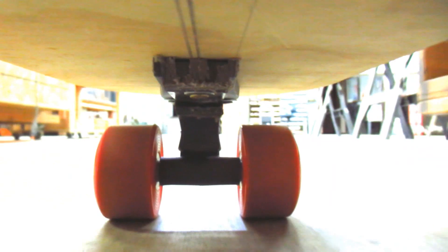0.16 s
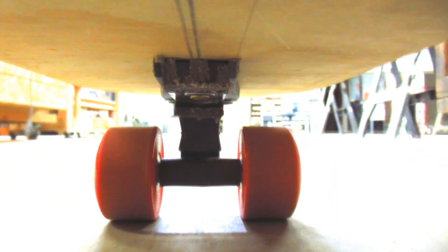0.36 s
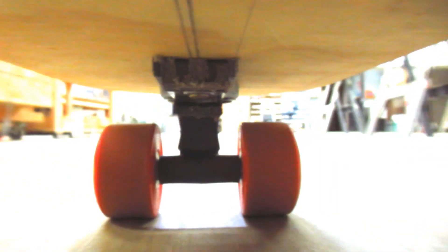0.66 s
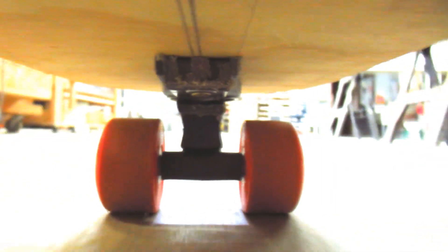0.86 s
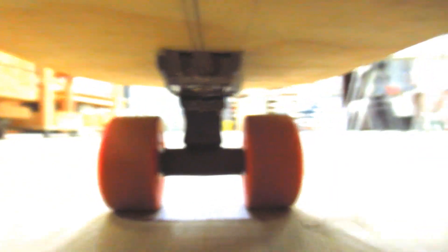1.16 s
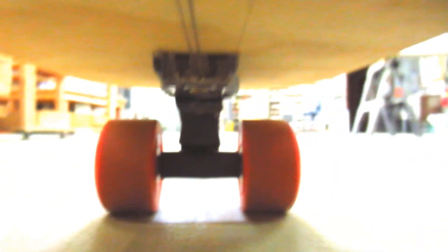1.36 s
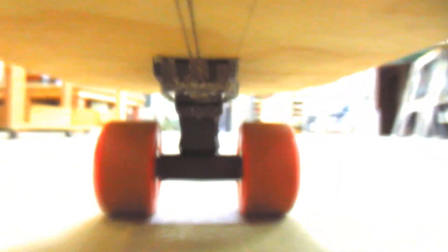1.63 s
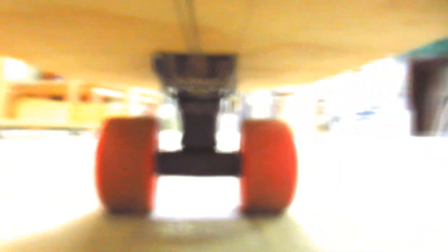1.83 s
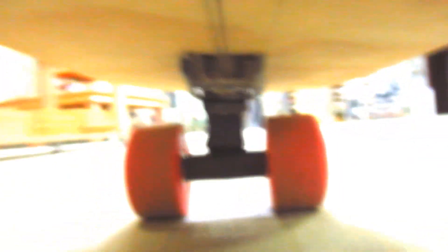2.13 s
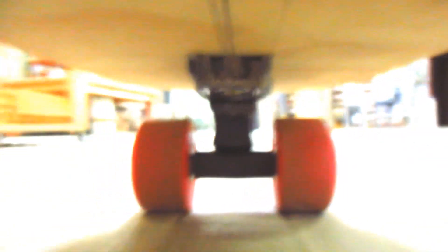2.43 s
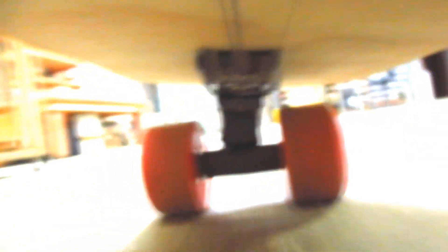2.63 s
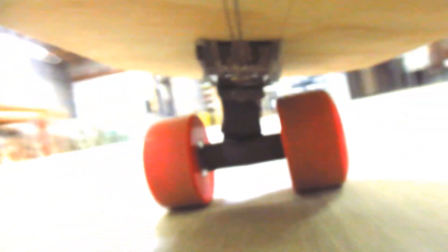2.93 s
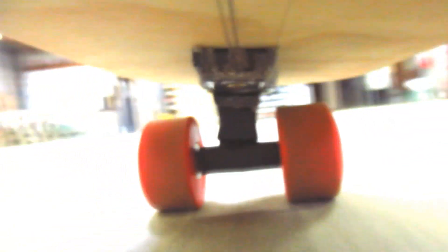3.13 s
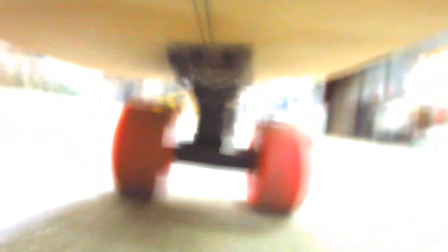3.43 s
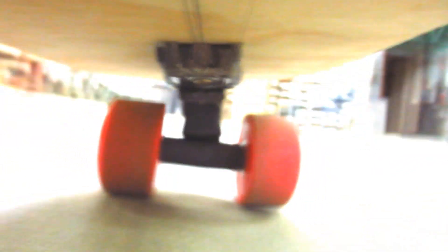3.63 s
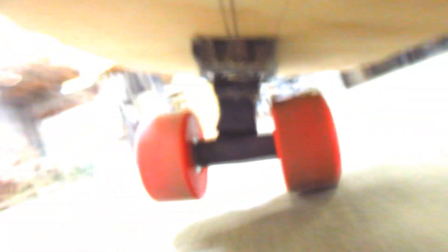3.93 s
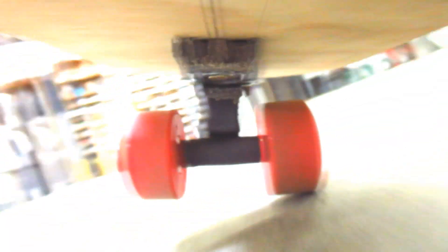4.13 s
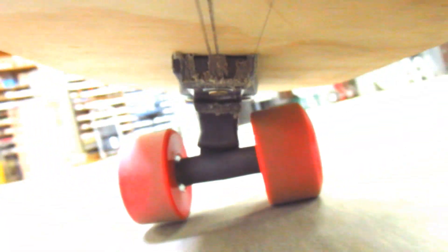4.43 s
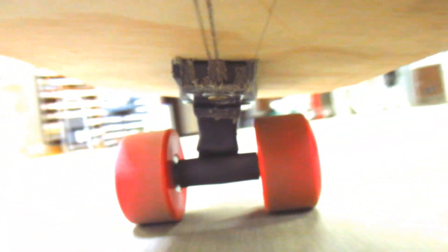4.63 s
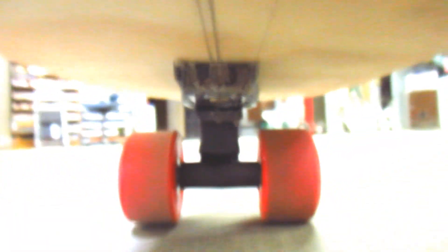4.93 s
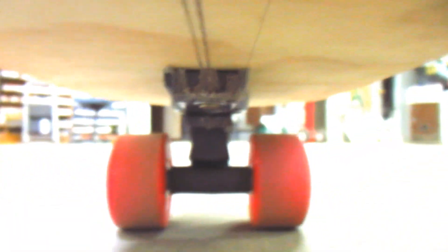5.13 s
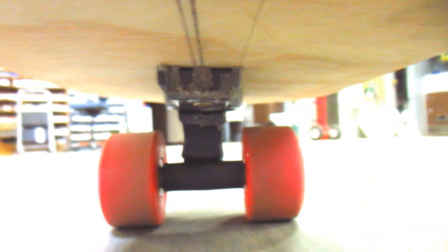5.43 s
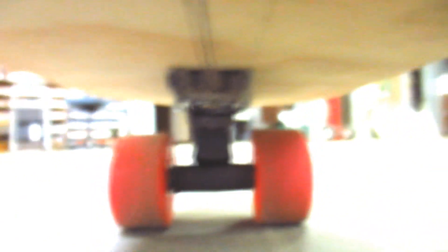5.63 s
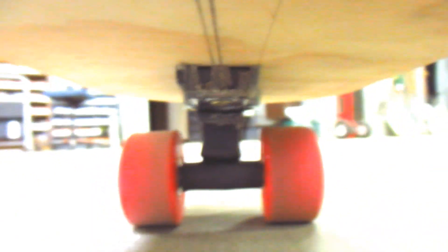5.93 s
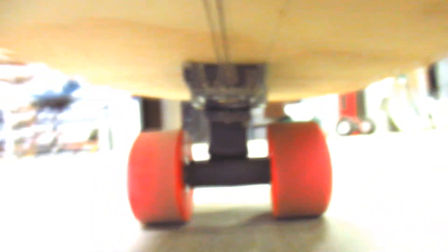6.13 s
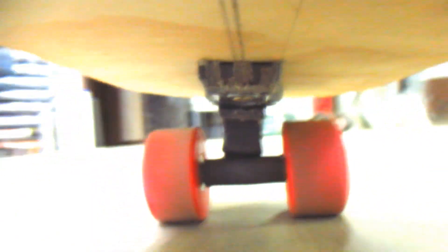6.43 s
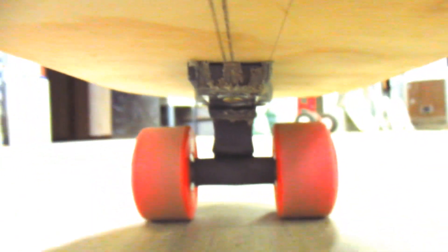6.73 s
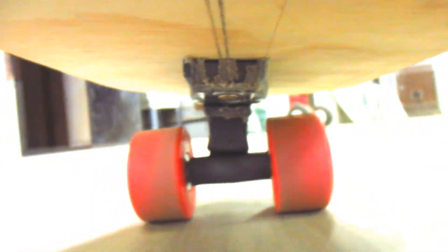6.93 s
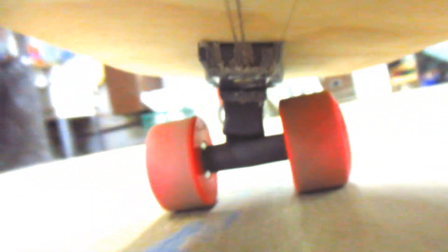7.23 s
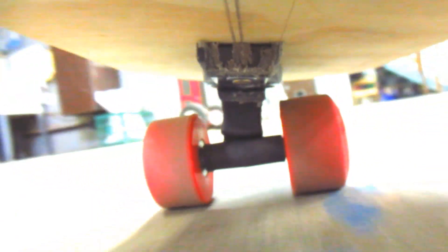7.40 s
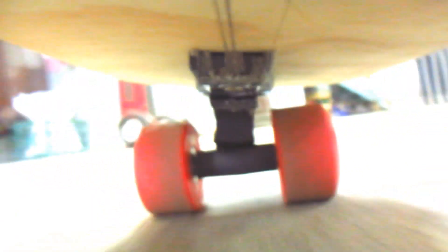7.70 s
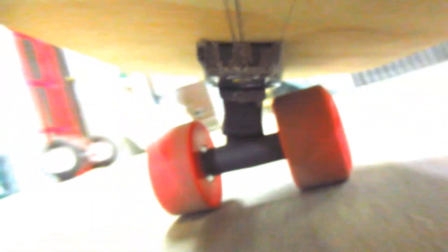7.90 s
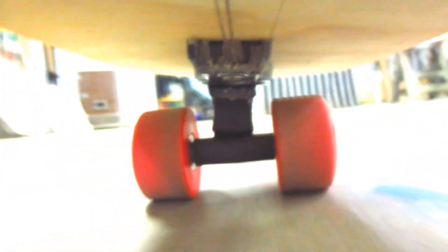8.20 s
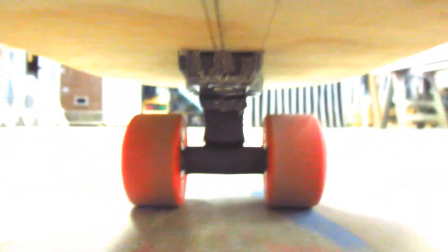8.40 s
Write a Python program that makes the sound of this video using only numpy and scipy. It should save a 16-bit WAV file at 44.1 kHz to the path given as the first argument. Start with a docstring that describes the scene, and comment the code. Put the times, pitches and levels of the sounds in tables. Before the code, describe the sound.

Heard close beneath a wooden skateboard deck in a workshop: near quiet, then two hard knocks as the rider gets on. Rolling builds into low rumble, hollow wheel growl and crackling grit. Irregular thuds and clacks cross cracks, sometimes in clusters, while the loose truck ticks and rattles. Roar rises and falls through turns, with a rasping scuff, a faint metallic chinking and small rubber squeaks near the end. Very little room echo.

```python
"""Skateboard on workshop concrete

A skateboard rides over a concrete floor, heard by two microphones hung under its wooden deck.
Two knocks come as the rider gets on; then noise bumps rumble in the deck and growl in the hard wheels,
with crackling grit. Damped modes bang over cracks; gliding resonances roar, short sines chatter and
rasping noise scuffs in the turns. The loose truck ticks, rattles, creaks and squeaks, and a washer chinks."""
import sys
import numpy as np
from scipy import signal
from scipy.fft import rfft, irfft
from scipy.io import wavfile
from scipy.ndimage import uniform_filter1d

SR = 44100
rng = np.random.default_rng(int(sys.argv[2]) if len(sys.argv) > 2 else 0)


def unload_audio(sound):
    """Save the sound as a 16-bit wav file, at the path given as the first command line argument."""
    columns = np.transpose(np.atleast_2d(sound))
    # keep every value between -1 and 1, then stretch to whole-number steps
    steps = np.round(np.clip(columns, -1, 1) * 32767)
    wavfile.write(sys.argv[1], SR, steps.astype(np.int16))


N = 377496
TIME = np.arange(N) / SR
HIT = np.arange(8192) / SR  # time axis of one hit, s


def undb(db):
    """Decibels to gain."""
    return 10 ** (np.asarray(db) / 20)


def unit(x):
    """Scale to rms 1."""
    return x / np.sqrt(np.mean(x ** 2))


def punch(x, size):
    """Scale so that the first `size` samples of a hit have rms 1."""
    return x / np.sqrt(np.mean(x[..., :size] ** 2))


def decay(t, t60_s):
    """Exponential fade of 60 dB in t60_s."""
    return undb(-60 * t / t60_s)


def attack(t, rise_s):
    """Exponential approach to 1."""
    return 1 - np.exp(-t / rise_s)


def curves(table):
    """The dB columns of a table as gains over time."""
    s, *columns = np.transpose(table)
    return [undb(np.interp(TIME, s, c)) for c in columns]


def swells(rows):
    """Smooth rises and falls, one for each (middle_s, length_s, height)."""
    out = np.zeros(N)
    for s, length, height in rows:
        add(out, s - length / 2, height * np.hanning(int(length * SR)))
    return out


def add(track, s, sound):
    """Mix a sound in at time s."""
    i = max(int(s * SR), 0)
    track[i:i + len(sound)] += sound[:max(N - i, 0)]


def gains(points, size):
    """A (Hz, dB) spectrum as gains on the bins of a transform."""
    hz, db = np.transpose(points)
    bins_hz = np.fft.rfftfreq(size, 1 / SR)
    return undb(np.interp(np.log(bins_hz + 1), np.log(hz), db))


def colour(x, points, size=4096):
    """Causal minimum-phase filter with the given spectrum."""
    cepstrum = irfft(np.log(gains(points, size)))
    cepstrum[1:size // 2] *= 2
    cepstrum[size // 2 + 1:] = 0
    response = irfft(np.exp(rfft(cepstrum)))
    return signal.fftconvolve(x, response)[:len(x)]


def walk(rate_hz):
    """Smooth random wander about zero, rms 1."""
    k = int(SR / rate_hz)
    steps = np.repeat(rng.standard_normal(N // k + 1), k)
    return unit(uniform_filter1d(steps, k)[:N])


def bumps(rate_hz, spread_db):
    """Random contacts of either sign, scattered in strength by spread_db."""
    chance, size, sign = rng.random(N), rng.standard_normal(N), rng.choice([-1, 1], N)
    return (chance < rate_hz / SR) * sign * undb(spread_db * np.clip(size, -2.5, 2.5))


def crackle(rate_hz, spread_db, t60_s):
    """Random grains, each a brief fading burst of noise."""
    power_step = undb(-120 / (t60_s * SR))
    power = signal.lfilter([1], [1, -power_step], bumps(rate_hz, spread_db) ** 2 + 1e-9)
    return np.sqrt(power) * rng.standard_normal(N)


def ring(modes, scatter_db, detune):
    """Damped modes; each call draws new weights, signs and detuning, as if struck elsewhere."""
    hz, t60, db = np.transpose(modes)[:, :, None]
    a, b, c = rng.standard_normal((3, len(modes), 1))
    envelope = undb(db + scatter_db * a) * decay(HIT, t60)
    tones = np.sin(2 * np.pi * hz * (1 + detune * b) * HIT)
    return np.sum(np.sign(c) * envelope * tones, axis=0)


def resonance(x, hz, width_hz):
    """A resonance whose pitch moves."""
    turn = np.exp(2j * np.pi * np.cumsum(hz) / SR)
    return np.imag(turn * signal.lfilter([1], [1, -np.exp(-np.pi * width_hz / SR)], x / turn))


# stereo width of the two ports: freq_hz [Hz], side_minus_mid_db [dB]
PORT_WIDTH = [(50, -28), (130, -19), (280, -12), (480, -3), (660, -8), (870, -5), (1150, -8), (1900, -2),
              (2400, -4), (3000, 0), (16000, 0)]
# balance of the two ports: freq_hz [Hz], left_minus_right_db [dB]
PORT_BALANCE = [(60, .2), (150, .6), (330, -1.4), (500, -1), (900, -4.5), (1300, -2), (2200, -3), (3200, 0),
                (4400, 3.5), (6200, -2.5), (7500, .3), (16000, .6)]


def ports(x, scatter_t60_s=0.025, size=2048):
    """Deck-floor reflections reach the two microphone ports differently, more so in the treble."""
    paths = rfft(rng.standard_normal(size) * decay(HIT[:size], scatter_t60_s))
    side = gains(PORT_WIDTH, size) * paths / np.abs(paths)
    lean = np.sqrt(gains(PORT_BALANCE, size))
    pair = np.array([(1 + side) * lean, (1 - side) / lean]) / np.sqrt(1 + np.abs(side) ** 2)
    response = np.roll(irfft(pair), size // 2, axis=1)
    return signal.fftconvolve(x[None], response, axes=1)[:, size // 2:size // 2 + N]


def hiss(level_db=-82):
    """Faint even microphone hiss: white noise, independent per channel."""
    return undb(level_db) * rng.standard_normal((2, N))


# steady bed spectrum: freq_hz [Hz], density_db [relative dB per Hz]
BED_SPECTRUM = [(30, 13), (120, -9), (300, -7), (600, -5), (1200, -4), (1800, -27), (2350, -8.5),
                (3200, -29), (8000, -30), (16000, -21)]


def steady_bed(level_db=-58):
    """A faint steady bed of coloured noise, with a band near 2.3 kHz."""
    return ports(undb(level_db) * unit(colour(rng.standard_normal(N), BED_SPECTRUM)))


def workshop(x, t60_s=0.18, wet_db=-27):
    """Faint tail of the cluttered room: convolution with decaying low-passed noise."""
    t = TIME[:SR // 2]
    tail = rng.standard_normal((2, len(t))) * decay(t, t60_s) * attack(t, 0.0066)
    tail = tail / np.sqrt(np.sum(tail[0] ** 2))
    tail = signal.lfilter(*signal.butter(1, 3000, fs=SR), tail)
    return undb(wet_db) * signal.fftconvolve(x, tail, axes=1)[:, :N]


# loose washer's modes: freq_hz [Hz], t60_s [s], level_db [relative dB]
WASHER_RING = [(2220, 0.023, 5), (2410, 0.031, 4)]
# chinking runs: start_s [s], end_s [s], level_db [dB]
CHINK_RUNS = [(6.419, 6.99, -41), (7.403, 7.6, -37.5)]


def washer(count=12, gap_s=0.052, jitter_s=0.036):
    """A loose washer is thrown against its nut at uneven intervals and rings briefly."""
    out = np.zeros(N)
    for start, end, db in CHINK_RUNS:
        times = start + gap_s * np.arange(count) + jitter_s * rng.standard_normal(count)
        for s in times:
            chink = ring(WASHER_RING, scatter_db=1, detune=.02)
            if s < end:
                add(out, s, undb(db) * punch(chink, size=220))
    return ports(out)


# bushing squeaks in the tightest turns: middle_s [s], length_s [s], pitch_hz [Hz], level_db [dB]
SQUEAK_EVENTS = [(4.65, .07, 1080, -43), (8.395, 0.034, 1070, -33.5), (8.447, 0.066, 1010, -40)]
# squeak partials: pitch_multiple [ratio], level_db [relative dB]
PARTIALS = [(1, 1), (1.55, -9), (2.27, -11.5), (2.95, -12)]


def squeaks(width_hz=110, waver=.025):
    """Rubber dragged round the kingpin: random slips drive a few wavering resonant partials."""
    s, length, hz, db = np.transpose(SQUEAK_EVENTS)
    pitch = np.interp(TIME, s, hz) * (1 + waver * walk(40))
    slips = bumps(rate_hz=4100, spread_db=11)
    song = np.zeros(N)
    for multiple, level_db in PARTIALS:
        narrow = resonance(slips, multiple * pitch, width_hz)
        song += undb(level_db) * unit(resonance(narrow, multiple * pitch, 3 * width_hz))
    return ports(unit(song) * swells(zip(s, length, undb(db))))


# bushing creaks and snaps while steering: middle_s [s], length_s [s], level_db [dB]
CREAK_EVENTS = [(1.252, 0.0073, -31), (4.504, 0.008, -38), (4.552, 0.0077, -36), (4.618, 0.12, -43),
                (4.66, 0.022, -33), (6.583, .07, -38), (8.383, 0.0063, -25), (8.412, 0.093, -43),
                (8.464, 0.015, -37.5)]
# rubber bushing creak spectrum: freq_hz [Hz], density_db [relative dB per Hz]
BUSHING_SPECTRUM = [(500, -12), (850, 3.5), (1000, 2.5), (1250, -4), (1900, -6), (2400, -3), (2750, -5.5),
                    (3300, -13), (3900, -21), (5500, -21.5), (9000, -24.5), (16000, -30)]


def creaks():
    """A bushing sticks and slips in short runs that ring the truck: bumps and noise, coloured."""
    out = np.zeros(N)
    for s, length, db in CREAK_EVENTS:
        swell = np.hanning(int(length * SR))
        slips = bumps(rate_hz=900, spread_db=3) + .15 * rng.standard_normal(N)
        slips = np.pad(slips[:len(swell)] * swell, (0, len(HIT)))
        add(out, s - length / 2, undb(db) * punch(colour(slips, BUSHING_SPECTRUM), size=len(swell)))
    return ports(out)


# wheels slipping sideways: middle_s [s], length_s [s], level_db [dB]
SCUFF_EVENTS = [(1.274, 0.092, -48), (1.408, .05, -46), (4.62, 0.13, -46), (4.659, 0.028, -44),
                (4.863, 0.034, -26), (6.584, 0.1, -45.5)]
# sliding tread spectrum: freq_hz [Hz], density_db [relative dB per Hz]
SCUFF_SPECTRUM = [(600, -70), (1000, 18), (2000, -1), (3000, 2), (4000, 0.5), (6000, 5), (10000, 2.5),
                  (16000, -4.5)]


def scuffs():
    """A sliding tread sticks and slips in a dense rasp of coloured bumps."""
    slip = swells((s, length, undb(db)) for s, length, db in SCUFF_EVENTS)
    return ports(slip * unit(colour(bumps(rate_hz=20000, spread_db=6), SCUFF_SPECTRUM)))


# randomly strewn ticks: start_s [s], end_s [s], snap_db, ring_db [dB before trims in ticks()]
STRAY_SPELLS = [(1.779, 3.8, -51, -46), (4.85, 7.752, -49.5, -53.5)]


def stray_ticks(count=32, scatter_db=5.5):
    """Rows of random ticks, strewn unevenly over each spell."""
    rows = []
    for start, end, snap_db, ring_db in STRAY_SPELLS:
        times = start + (end - start) * (np.arange(count) + rng.random(count)) / count
        scatter = scatter_db * rng.standard_normal((count, 2))
        rows += [(s, snap_db + a, ring_db + b) for s, (a, b) in zip(times, scatter)]
    return rows


# single grain cracks and truck ticks: start_s [s], snap_db, ring_db [dB before trims in ticks()]
TICK_EVENTS = [(0.185, -54, -62), (0.202, -57, -64), (1.288, -41, -60), (1.397, -48, -45),
               (1.495, -46, -44), (1.558, -57, -40), (1.749, -47, -43), (1.928, -53, -39),
               (2.146, -53, -32.5), (2.317, -41.5, -40.5), (2.442, -39.5, -47), (2.576, -42, -40),
               (2.625, -41, -36.5), (2.883, -38.5, -39), (3.137, -49, -34.5), (3.177, -42, -49),
               (3.748, -46, -40), (3.892, -40, -39), (3.927, -42, -51), (4.216, -49, -54),
               (4.672, -39.5, -60), (4.986, -55, -41), (5.009, -55, -42), (5.348, -42, -61),
               (5.422, -53, -40), (5.589, -43, -51), (5.673, -41, -32), (5.712, -35, -56),
               (6.178, -45, -60), (6.313, -42, -44), (6.869, -41.5, -68), (6.921, -37.5, -65),
               (7.629, -38.5, -67)]
# loose-truck rattle bouts: middle_s [s], length_s [s], level_db [dB before channel gains]
RATTLE_BOUTS = [(1.385, 0.069, -42.5), (1.974, 0.44, -48), (2.498, 0.71, -57), (2.836, 0.23, -45.5),
                (3.174, .22, -46), (3.355, 0.082, -40.5), (3.6, 0.35, -44.5), (4.097, 0.2, -53),
                (4.97, .16, -57), (5.723, 0.18, -48)]
# metal truck's damped resonance: freq_hz [Hz], density_db [relative dB per Hz]
TRUCK_SPECTRUM = [(1500, -12), (2800, -5), (3500, -7), (4000, 2), (4450, 5), (5000, 4), (5600, -9),
                  (7500, -13), (10000, -36), (16000, -38)]
# floor grit, also in knocks and wheels: freq_hz [Hz], density_db [relative dB per Hz]
GRIT_SPECTRUM = [(800, -4), (2000, 15.5), (3200, 5), (4500, 4), (6000, 1), (8500, 0.5), (11000, -4.5),
                 (14000, -7.5), (16000, -15)]


def ticks(t60_s=0.017, snap_trim_db=3, ring_trim_db=-2, left_db=2.75, right_db=-5.5):
    """Grains snap under the tread; the truck, off to the left, ticks and rattles: noise bursts."""
    snaps, taps = np.zeros(N), np.zeros(N)
    looseness = swells((s, length, undb(db)) for s, length, db in RATTLE_BOUTS)
    impacts = crackle(rate_hz=170, spread_db=4, t60_s=.007)
    rattle = looseness * unit(colour(impacts, TRUCK_SPECTRUM))
    for s, snap_db, ring_db in TICK_EVENTS + stray_ticks():
        bursts = rng.standard_normal((2, len(HIT))) * decay(HIT, t60_s) * attack(HIT, 0.00016)
        snap = punch(colour(bursts[0], GRIT_SPECTRUM), size=176)
        tap = punch(colour(bursts[1], TRUCK_SPECTRUM), size=176)
        add(snaps, s, undb(snap_db + snap_trim_db) * snap)
        add(taps, s, undb(ring_db + ring_trim_db) * tap)
    return ports(snaps) + (taps + rattle) * undb([[left_db], [right_db]])


# wheels hopping on their own springiness: middle_s [s], length_s [s], pitch_hz [Hz], peak_rms_db [dB]
CHATTER_EVENTS = [(3.638, .05, 170, -7.5), (4.077, 0.1, 217.5, -16.5), (4.52, .035, 232, -19),
                  (4.935, .09, 154.7, -11.5), (5.029, 0.0445, 210, -9.5), (5.237, 0.11, 208.3, -20.5)]


def chatter():
    """A wheel hops at a nearly steady rate: short sine swells."""
    out = np.zeros(N)
    for s, length, hz, db in CHATTER_EVENTS:
        swell = np.hanning(int(length * SR))
        hops = np.sin(2 * np.pi * hz * TIME[:len(swell)])
        add(out, s - length / 2, np.sqrt(2) * undb(db) * swell * hops)
    return ports(out)


# the ride: time_s [s], drive_db [dB, per wheel before layer gains], floor_coarseness_db [dB]
RIDE_CURVE = [(.25, -57, -16), (.35, -42, -8), (.82, -40.5, -7.5), (.98, -42, -4.5), (1.07, -33, -3.5),
              (1.5, -23.5, 1), (1.68, -35.5, 0), (1.92, -24, 0.5), (3.55, -19.5, 1), (4.14, -21.5, 1),
              (4.3, -27, -4), (5.35, -25, -1), (5.56, -30.5, -7), (5.65, -17, 5), (6.1, -26.5, 2.5),
              (7.66, -21, 1.5), (7.86, -27.5, 1), (8.56, -27, 0)]
CRUISE_DB = -22  # reference drive level


def rolling_gain():
    """How hard the board rolls, as a gain over time."""
    return curves(RIDE_CURVE)[0]


# hollow wheel swells as the rider leans:
# middle_s [s], length_s [s], pitch_hz [Hz], level_db [dB, gain added to the rest roar]
ROAR_SWELLS = [(.79, 0.29, 690, -45), (1.44, 0.52, 693, -31), (1.955, 0.57, 830, -35),
               (3.0, 0.55, 504, -38), (4.077, 0.33, 470, -28), (4.914, 0.57, 710, -32),
               (5.376, 0.37, 700, -27.5), (5.756, 0.38, 820, -28.5), (6.943, 0.38, 880, -37.5),
               (7.2, 0.43, 540, -33), (7.6, 0.77, 654, -37)]


def roar(rest_db=-24):
    """Floor grain drives a hollow resonance of the loaded wheels, gliding from lean to lean."""
    s, length, hz, db = np.transpose(ROAR_SWELLS)
    pitch = np.interp(TIME, s, hz)
    # the rest level follows the ride; swells add to it as gains
    level = undb(rest_db) * rolling_gain() + swells(zip(s, length, undb(db)))
    grain = bumps(rate_hz=2000, spread_db=2.0)
    hollow = resonance(resonance(grain, pitch, width_hz=210), pitch, width_hz=220)
    return ports(unit(hollow) * level)


# blows through wheels and deck: start_s [s], bounce_hz [Hz], thud_db [dB], clack_db [dB]
KNOCK_EVENTS = [(.031, 200, -65, -49), (0.083, 200, -60, -45.5), (.131, 187, -13, -33),
                (0.142, 309, -10.5, -13.5), (0.16, 148, -27, -34), (.172, 80, -24, -41),
                (.458, 197, -48, -45.5), (0.6114, 150, -6, -8), (0.617, 158, -20, -15.5),
                (.634, 110, -23, -37), (1.2498, 118, -28, -34), (1.368, 198, -14, -18),
                (1.376, 164, -12.5, -20.5), (1.462, 150, -22, -33), (1.564, 187, -19, -22),
                (1.578, 207, -6, -13.5), (1.976, 229, -37, -23), (2.13, 178, -11.5, -20.5),
                (2.05, 170, -38, -37), (3.105, 167, -21, -27.5), (3.326, 173, -12, -27),
                (3.354, 111, -7.5, -24), (3.424, 162, -11.5, -25), (3.496, 159, -10, -26),
                (3.559, 173, -15, -21.5), (3.574, 175, -10, -24.5), (3.766, 196, -20, -28),
                (3.888, 180, -20, -31), (4.776, 150, -21, -46), (4.824, 130, -19, -27),
                (4.851, 170, -26, -21), (4.859, 153, -12, -39), (5, 170, -16, -25), (5.074, 230, -18, -17),
                (5.084, 239, -9, -21), (5.626, 151, -17, -36), (5.678, 174, -11, -19.5),
                (5.82, 149, -28, -18.5), (6.278, 110, -14, -21.5), (6.289, 111, -18, -16),
                (6.477, 152, -12, -34), (6.575, 160, -32, -38), (7.152, 144, -11.5, -24.5),
                (7.733, 110, -13, -21), (7.745, 117, -8, -23), (7.764, 115, -6.5, -15.5),
                (7.982, 130, -27, -26.5), (8.071, 157, -21, -29.5), (8.158, 147, -17.5, -28.5),
                (8.22, 139, -19, -28), (8.46, 148, -24, -41)]
# struck board's modes, also in wheels: freq_hz [Hz], t60_s [s], level_db [relative dB]
BOARD_MODES = [(257, 0.047, -1), (391, 0.026, 4), (485, 0.044, -2), (583, 0.015, 7), (669, 0.027, -4),
               (743, 0.01, 4), (930, 0.044, -5), (1090, 0.055, -12), (1285, 0.037, -7.5),
               (1390, 0.036, -18), (1500, 0.013, -7), (1840, 0.022, -18), (2210, .02, -15),
               (2410, 0.033, -18), (2770, 0.018, -29)]


def knocks(thud_t60_s=0.049, crunch_t60_s=0.06, crunch_db=-13, crunch_slope=0.16, bass_cut_hz=70):
    """Each blow bounces the board on its wheels, rings the deck and crushes grit with its clack."""
    body, crush = np.zeros(N), np.zeros(N)
    for s, hz, thud_db, clack_db in KNOCK_EVENTS:
        thud = -np.sin(2 * np.pi * hz * HIT) * decay(HIT, thud_t60_s)
        modes = ring(BOARD_MODES, scatter_db=1.5, detune=.025)
        clack = modes * attack(HIT, 0.00027)  # the tread cushions the contact
        crunch = attack(HIT, 0.0004) ** 2 * decay(HIT, crunch_t60_s)
        add(body, s, undb(thud_db) * punch(thud, size=441))
        add(body, s, undb(clack_db) * punch(clack, size=441))
        add(crush, s, undb(clack_db + crunch_db) * punch(crunch, size=441))
    # a faster wheel crushes more grit: slope in dB per dB of drive
    crush = crush * (rolling_gain() / undb(CRUISE_DB)) ** crunch_slope
    # the blows carry no deep bass
    body = signal.lfilter(*signal.butter(2, bass_cut_hz, "high", fs=SR), body)
    grit = unit(colour(bumps(rate_hz=8300, spread_db=1), GRIT_SPECTRUM))
    return ports(body + crush * grit)


# coarse, smooth and sandy floor: middle_s [s], length_s [s], coarser_db [dB], extra_grit_db [dB]
FLOOR_PATCHES = [(0.508, 0.11, 4, 6), (0.82, 0.35, 8, -0.5), (1.04, 0.49, 2.5, 3.5), (1.327, 0.27, 6, -1),
                 (1.946, 0.71, 3, 3.5), (2.194, 0.32, 1, 7.5), (2.547, 0.32, 6, -3), (2.854, 0.25, 4, 5),
                 (3.144, 0.24, 3, 5), (3.366, 0.097, 2.5, 7.5), (3.492, 0.19, 2.5, -3), (3.639, 0.14, 5, 0),
                 (4.12, 0.22, 3.5, 0.5), (4.746, 0.17, -1, -1), (4.928, 0.55, 12.5, -1.5),
                 (5.202, 0.25, 3.5, -4), (5.427, 0.36, 11.5, -1.5), (5.77, 0.21, 4.5, 0),
                 (6.104, 0.21, -3, -5), (6.268, 0.42, 3.5, -3.5), (6.4, 0.19, -1, 3), (6.616, 0.31, 1, 5),
                 (6.92, 0.14, 3, 0), (7.186, 0.21, 3.5, 4.5), (8.175, 0.29, 2.5, 1.5),
                 (8.4, 0.16, -0.5, 10.5)]
GROWL_DB, GROWL_SLOPE = -32.5, 0.67  # drive at cruise before layer gains; dB per dB of ride
GRIT_DB, GRIT_SLOPE = -57, 0.65  # the same for grit
PATCH_RUMBLE_SHARE = 0.63  # dB of rumble per dB of coarser patch


def contact_levels():
    """Rumble, growl and grit rise with the ride; coarse floor lifts growl and grit most."""
    level, coarse = curves(RIDE_CURVE)
    pace = level / undb(CRUISE_DB)
    patch_db = swells((s, length, db) for s, length, db, _ in FLOOR_PATCHES)
    sand_db = swells((s, length, db) for s, length, _, db in FLOOR_PATCHES)
    rumble = level * undb(PATCH_RUMBLE_SHARE * patch_db)
    growl = pace ** GROWL_SLOPE * coarse * undb(GROWL_DB + patch_db)
    grit = pace ** GRIT_SLOPE * coarse * undb(GRIT_DB + patch_db + sand_db)
    return rumble, growl, grit


# deck rumble spectrum: freq_hz [Hz], density_db [relative dB per Hz]
DECK_SPECTRUM = [(20, -34), (35, -63), (55, -15), (80, -9), (115, -1), (160, 0.5), (215, -4.5), (280, -4),
                 (360, -11), (450, -23), (700, -49), (1500, -63)]
# hard wheel growl spectrum: freq_hz [Hz], density_db [relative dB per Hz]
WHEEL_SPECTRUM = [(200, -36.5), (380, 2), (480, 3.5), (660, 1.5), (850, -3), (1100, -6), (1300, -10),
                  (1550, -13), (1900, -20.5), (2350, -14.5), (2800, -24.5), (3500, -29), (6000, -89),
                  (12000, -110)]


def wheel(rumble, growl, grit, deck_db=-5, tread_db=-7, jolt_db=-18, sand_t60_s=0.0039):
    """One wheel: broad bumps shake the deck, fine ones ring the wheel, pits jolt the board, sand cracks."""
    patch = walk(55)  # rough and smooth floor passes under the tread
    deck = colour(bumps(rate_hz=900, spread_db=3) * undb(1.68 * patch), DECK_SPECTRUM)
    tread = colour(bumps(rate_hz=1300, spread_db=5) * undb(3.03 * patch), WHEEL_SPECTRUM)
    board = ring(BOARD_MODES, scatter_db=1, detune=.04)
    jolts = signal.fftconvolve(bumps(rate_hz=100, spread_db=2.5), board)[:N]
    sand = crackle(rate_hz=1800, spread_db=6, t60_s=sand_t60_s) * undb(2.5 * patch)
    pebbles = crackle(rate_hz=7, spread_db=3, t60_s=.005)
    grains = unit(colour(unit(sand) + .4 * unit(pebbles), GRIT_SPECTRUM))
    contact = unit(tread) * undb(tread_db) + unit(jolts) * undb(jolt_db)
    return ports(rumble * unit(deck) * undb(deck_db) + growl * contact + grit * grains)


def scene():
    """Four wheels and the board's knocks, ticks, creaks and scuffs in the room."""
    controls = contact_levels()
    rolling = sum(wheel(*controls) for _ in range(4)) + roar() + chatter()
    board = rolling + knocks() + ticks() + washer() + creaks() + squeaks() + scuffs()
    return board + workshop(board) + steady_bed() + hiss()


def record(dry, top_hz=15900):
    """The hardest knocks overload the input softly; a steep low-pass cuts the top."""
    clipped = dry / (1 + dry ** 8) ** (1 / 8)
    lowpass = signal.ellip(10, .2, 80, top_hz, fs=SR, output="sos")
    return signal.sosfilt(lowpass, clipped)


dry = scene()
out = record(dry)
unload_audio(out)
```